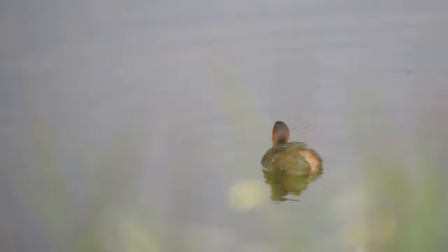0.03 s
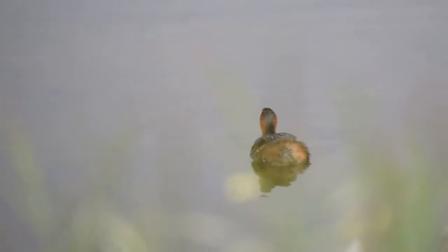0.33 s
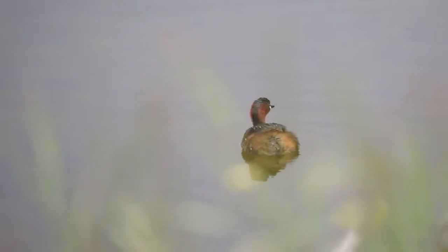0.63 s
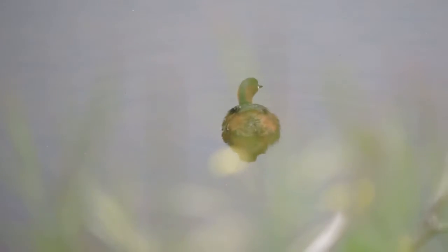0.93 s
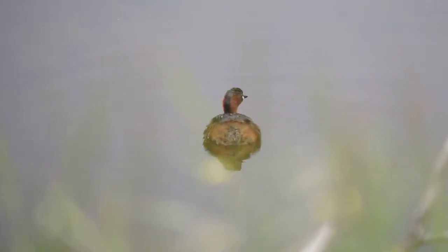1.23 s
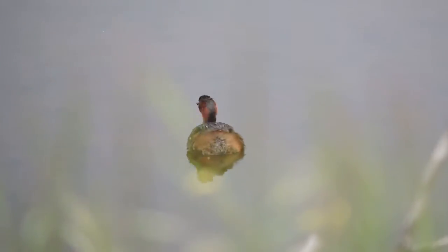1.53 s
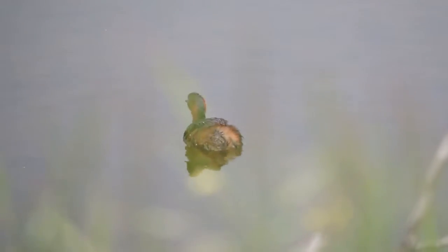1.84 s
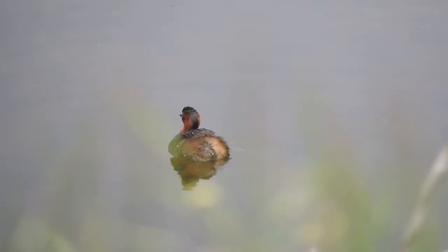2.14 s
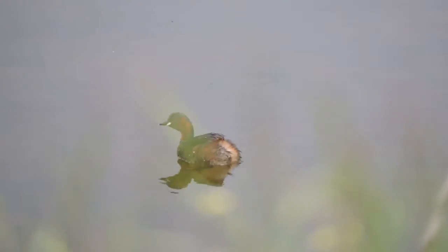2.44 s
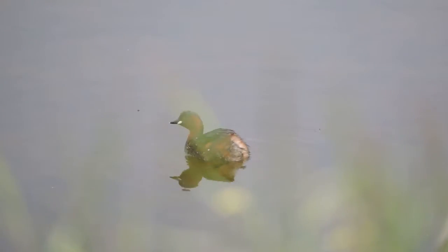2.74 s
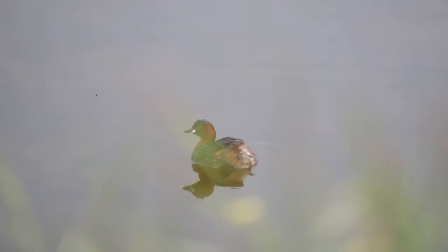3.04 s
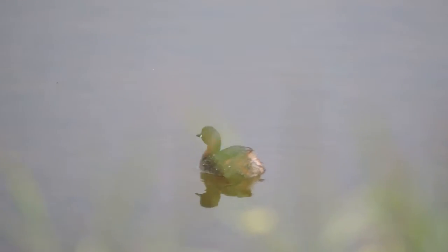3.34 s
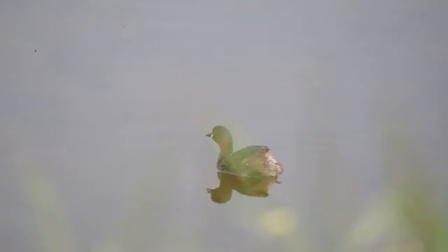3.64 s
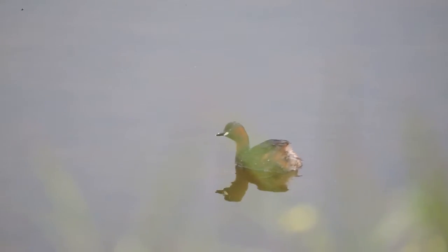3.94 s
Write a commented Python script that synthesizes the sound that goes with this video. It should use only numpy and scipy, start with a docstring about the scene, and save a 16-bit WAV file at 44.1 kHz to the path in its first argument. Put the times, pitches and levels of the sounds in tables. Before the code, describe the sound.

Soft, low wind thumps on the microphone above a faint hiss at a calm pond.

```python
"""A broad, steady wash of distant air and water at a quiet pond bank, with a low rumble and a fine hiss.
Light wind buffets the microphone, mostly its right port, where the strongest eddies thump as single
pressure pulses. Close by, water plips ring in damped modes, reeds rustle in swells of grainy noise and
an insect trills in rasping strokes; far away, very faint chirps glide. The sound cuts in just after 0 s."""
import sys
import numpy as np
from scipy.fft import rfft, irfft, next_fast_len
from scipy.io import wavfile
from scipy.ndimage import map_coordinates

SR = 44100
rng = np.random.default_rng(int(sys.argv[2]) if len(sys.argv) > 2 else 0)


def store_pcm(level_fs):
    """Save levels as 16-bit WAV."""
    pcm = np.round(np.clip(level_fs, -1, 1) * 32767).astype(np.int16)
    wavfile.write(sys.argv[1], SR, np.atleast_2d(pcm).T)


N = 176400
TIME = np.arange(N) / SR


def amp(db):
    """Decibels to amplitude gain."""
    return 10 ** (np.asarray(db) / 20)


def unit(x):
    """Normalisation to rms 1."""
    return x / np.sqrt(np.mean(x ** 2) + 1e-20)


def along(points, hz):
    """Interpolation of (Hz, value) points on a log frequency axis."""
    f, v = np.transpose(points)
    return np.interp(np.log(hz + 1), np.log(f + 1), v)


def pan(db):
    """Level-difference panning: gains that put the left side db above the right."""
    return amp([[db / 2], [-db / 2]])


def wobble(rate):
    """Smooth random modulation: a spline through rate knots a second."""
    return map_coordinates(rng.standard_normal(4096), [TIME * rate], mode="mirror")


def swell(middle, half):
    """A Gaussian envelope; the half length is its standard deviation."""
    return np.exp(-.5 * ((TIME - middle) / half) ** 2)


def filtered(x, response):
    """Linear filtering: the spectrum of x times a frequency response."""
    m = next_fast_len(N + SR // 2)
    return irfft(rfft(x, m) * response(np.fft.rfftfreq(m, 1 / SR)), m)[..., :N]


def rush(spectrum, alike=None):
    """Coloured stereo noise of rms 1; the mid-side balance sets the correlation, zero unless given."""
    def response(hz):
        likeness = np.clip(along(alike, hz), -1, 1) if alike else np.zeros_like(hz)
        turn = np.arccos(likeness) / 2
        return amp(along(spectrum, hz)) * [np.cos(turn), np.sin(turn)]
    mid, side = filtered(rng.standard_normal((2, N)), response)
    return unit(np.array([mid + side, mid - side]))


# Three noise spectra. Each row: frequency in Hz, relative spectral density in dB.
RUMBLE_SPECTRUM = [(10, 2), (25, 0.5), (55, 1.5), (90, -8), (150, -11.5), (210, -12.5), (330, -17.5),
                   (500, -26), (1500, -81)]
WASH_SPECTRUM = [(40, -12.5), (150, -5), (320, -2), (500, -2.3), (800, -2.5), (1200, -4), (1900, -6.5),
                 (2650, -9.5), (3400, -13), (5000, -18.5), (8000, -26), (15000, -46)]
HISS_SPECTRUM = [(300, 8.5), (2500, -7.5), (5000, -0.5), (7500, -2), (10000, -3.5), (13000, -4.5),
                 (16000, -3.5)]
# Likeness of the two sides. Each row: frequency in Hz, left-right correlation from 0 to 1.
CORRELATION = [(50, 0.92), (130, 0.65), (290, 0), (640, 0.11), (1400, 0), (3000, 0)]

def air_and_water():
    """Distant sound forms a diffuse field: the two sides are alike only at long wavelengths."""
    rise_db_per_s = 0.09
    drift_db = rise_db_per_s * (TIME - TIME.mean()) + 0.39 * wobble(rate=3.4)
    wash = amp(-58.5 + drift_db) * rush(WASH_SPECTRUM, CORRELATION)
    rumble = amp(-56) * pan(db=2) * rush(RUMBLE_SPECTRUM, CORRELATION)
    hiss = amp(-66.5) * rush(HISS_SPECTRUM)
    return rumble + wash + hiss


# Wind at the sheltered left port and the open right port. Each row: time in seconds, level in dB.
SHELTERED_GUSTS = [(.08, -63), (.21, -47.5), (.3, -50.5), (.52, -46.5), (.65, -47), (.78, -43), (.95, -49),
                   (1.06, -46.5), (1.2, -62), (2.5, -58), (2.95, -56), (3.15, -64), (4, -62)]
OPEN_GUSTS = [(.08, -48), (.22, -45.5), (.31, -44.5), (.39, -39), (.47, -41), (.58, -40), (.64, -55),
              (.82, -49), (1.08, -46), (1.22, -45.5), (1.36, -61), (1.52, -39.5), (1.62, -54), (1.75, -38),
              (1.87, -47.5), (2.03, -52), (2.13, -44), (2.33, -56), (2.56, -52), (2.76, -37.5), (2.91, -60),
              (2.96, -40.5), (3.1, -54), (3.19, -46.5), (3.32, -55.5), (3.38, -52), (3.47, -53), (4, -56)]
# Spectrum of the buffeting. Each row: frequency in Hz, relative spectral density in dB.
BUFFET_SPECTRUM = [(6, -4.5), (14, -16.5), (28, 1.5), (42, -3), (70, -9.5), (100, -16), (150, -25),
                   (250, -48), (500, -47), (1500, -92)]

def wind_buffeting():
    """Turbulent pressure is local, so gusts push on each port separately, in irregular lumps."""
    ports = (SHELTERED_GUSTS, OPEN_GUSTS)
    gust_db = np.array([np.interp(TIME, *np.transpose(gusts)) for gusts in ports])
    lumps_db = 2 * np.array([wobble(rate=22) for _ in ports])
    return amp(gust_db) * unit(amp(lumps_db) * rush(BUFFET_SPECTRUM))


# Soft plips of water. Each row: start in seconds, level in dB.
PLIPS = [(.236, -47.5), (.2497, -48), (.2835, -61)]
# Modes of a plip. Each row: frequency in Hz, relative level in dB, time to decay by 60 dB in seconds.
PLIP_MODES = [(1080, -4, .02), (1230, 0, .022)]

def water_plips():
    """Damped free oscillation: each plip builds for an instant, then its two modes decay exponentially."""
    attack_s = .0008
    out = np.zeros(N)
    for start, db in PLIPS:
        age = np.maximum(TIME - start, 0)
        attack = 1 - np.exp(-age / attack_s)
        for hz, mode_db, t60 in PLIP_MODES:
            out += amp(db + mode_db - 60 * age / t60) * attack * np.sin(2 * np.pi * hz * age)
    return out * pan(db=4)


# The strongest eddies at the right port. Each row: centre in seconds, peak in dB, pitch in Hz.
EDDIES = [(.316, -32, 32), (.475, -31.5, 50), (.558, -33, 42), (.601, -31.5, 59), (.775, -41, 78),
          (.815, -36, 48), (.892, -34.5, 72), (.979, -33.5, 86), (1.037, -36, 86), (1.076, -33, 68),
          (1.16, -38, 72), (1.233, -38, 72), (1.757, -35, 80), (2.256, -39.5, 68), (2.776, -35, 53),
          (2.866, -37.5, 68)]

def eddy_thumps():
    """A pressure pulse without resonance: each eddy is one low push or pull on the port."""
    right = np.zeros(N)
    for centre, db, hz in EDDIES:
        u = (np.pi * hz * (TIME - centre)) ** 2
        ricker_pulse = (1 - 2 * u) * np.exp(-u)
        right += rng.choice([-1, 1]) * amp(db) * ricker_pulse
    return np.array([amp(-28) * right, right])


# Reed rustles. Each row: centre in seconds, half length in seconds, level in dB, left minus right in dB.
REED_SWELLS = [(.84, 0.11, -74, -1), (1.69, .07, -76, -2), (3.36, 0.07, -77, -1)]
# Spectrum of the reeds. Each row: frequency in Hz, relative spectral density in dB.
REED_SPECTRUM = [(2000, -41), (5500, -19), (6900, -1), (7700, 0.5), (8600, -12), (12000, -13), (15500, -13)]

def reed_rustles():
    """Random amplitude modulation gives high noise a fine grain, heard in brief swells."""
    grain_db = 2.5 * wobble(rate=300)
    rustle = unit(amp(grain_db) * rush(REED_SPECTRUM))
    return rustle * sum(amp(db) * swell(s, half) * pan(pan_db) for s, half, db, pan_db in REED_SWELLS)


# Far chirps. Each row: centre in seconds, half length in seconds, pitch in Hz, glide in Hz per second,
# level in dB, left minus right in dB.
CHIRP_NOTES = [(1.91, .04, 2700, -500, -71, 2), (2.07, .05, 2630, -600, -70, -1),
               (3.9, 0.04, 1480, 1500, -69, 10)]

def far_chirps():
    """Linear frequency sweeps, blurred by distance: random amplitude and phase widen each into a band."""
    blur_hz = 70
    out = np.zeros((2, N))
    for centre, half, hz, glide, db, pan_db in CHIRP_NOTES:
        t = TIME - centre
        phase = 2 * np.pi * (hz * t + glide * t ** 2 / 2)
        blur = np.array([wobble(2 * blur_hz) + 1j * wobble(2 * blur_hz) for _ in range(2)])
        note = unit((blur * np.exp(1j * phase)).real)
        out += amp(db) * pan(pan_db) * swell(centre, half) * note
    return out


# Spectrum of the insect's rasp. Each row: frequency in Hz, relative spectral density in dB.
RASP_SPECTRUM = [(3000, -40), (6600, -8), (7300, -1), (7800, -4), (8500, -13), (9700, -8), (12000, -10),
                 (15500, -18)]

def insect_trill():
    """A periodic pulse train: six strokes of high, rasping noise, each louder than the last."""
    first_s, period_s = 2.185, .024
    first_db, step_db = -70.5, 1
    strokes = sum(amp(first_db + step_db * k) * swell(first_s + k * period_s, half=.003)
                  for k in range(6))
    return strokes * rush(RASP_SPECTRUM)


def scene():
    """Superposition: the pressures of all sources heard from the bank add."""
    return (air_and_water() + wind_buffeting() + water_plips() + eddy_thumps()
            + reed_rustles() + far_chirps() + insect_trill())


def record(dry):
    """Gating and band limiting: the sound cuts in, and a low-pass removes the highest treble."""
    start_s, cutoff_hz = .072, 15780
    return filtered(dry * (TIME >= start_s), lambda hz: hz < cutoff_hz)


dry = scene()
out = record(dry)
store_pcm(out)
```